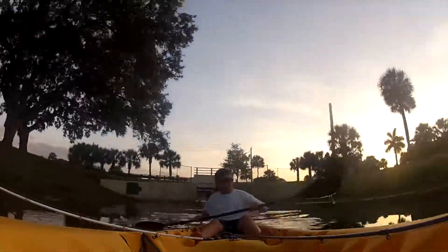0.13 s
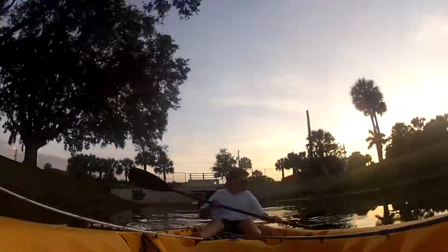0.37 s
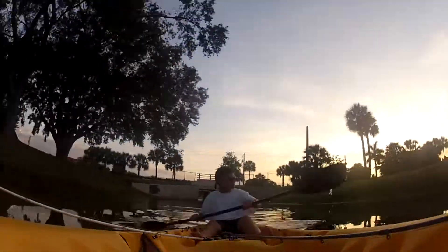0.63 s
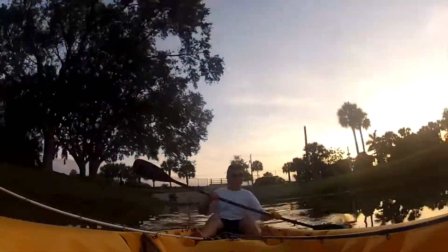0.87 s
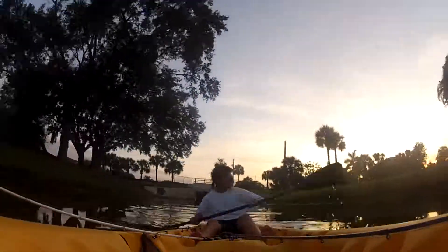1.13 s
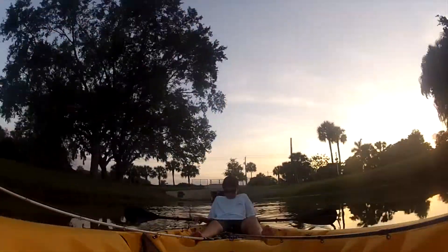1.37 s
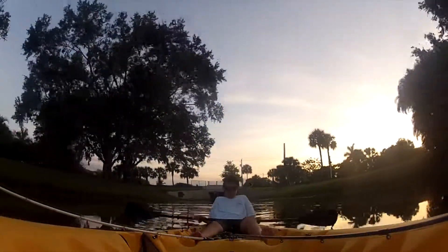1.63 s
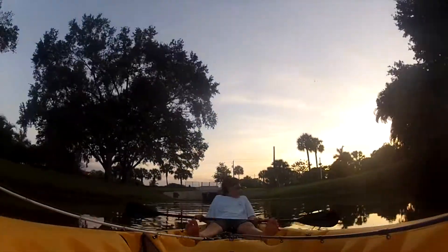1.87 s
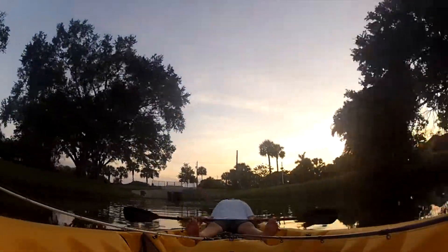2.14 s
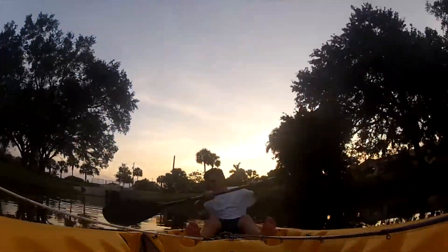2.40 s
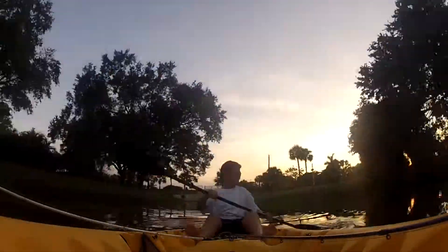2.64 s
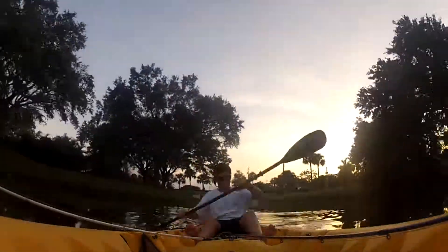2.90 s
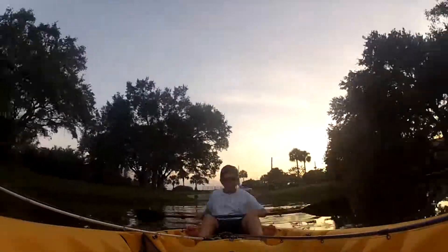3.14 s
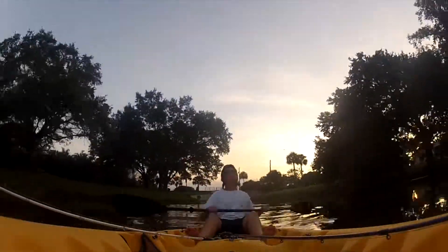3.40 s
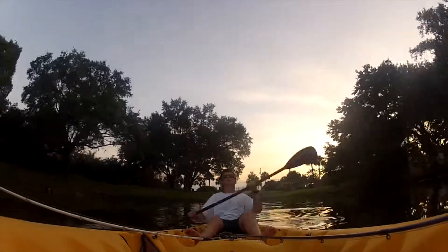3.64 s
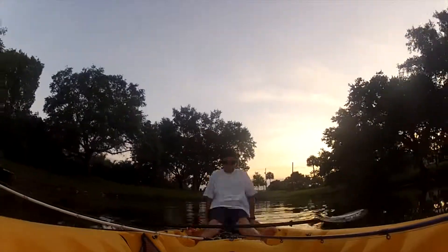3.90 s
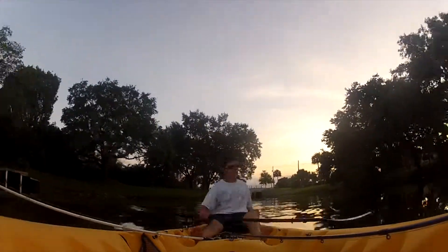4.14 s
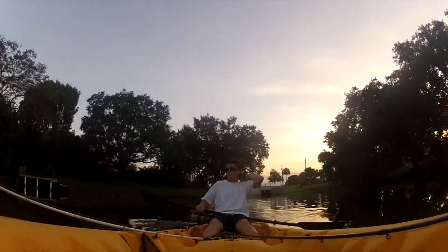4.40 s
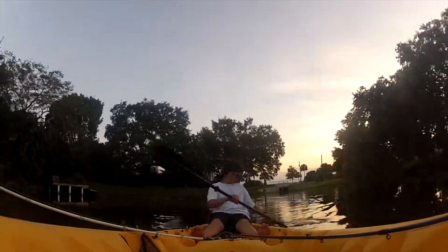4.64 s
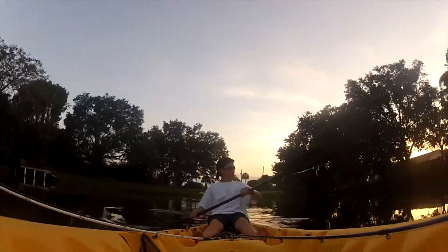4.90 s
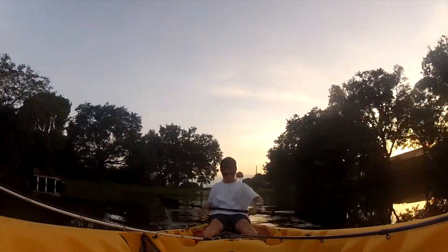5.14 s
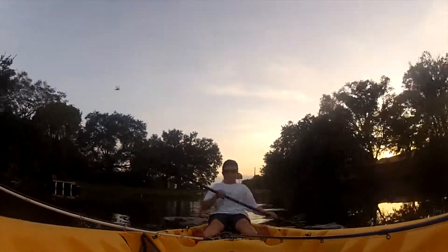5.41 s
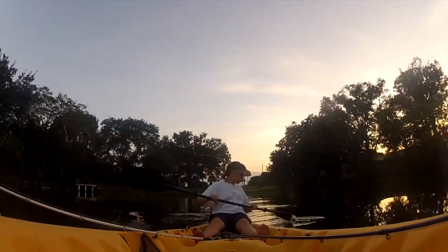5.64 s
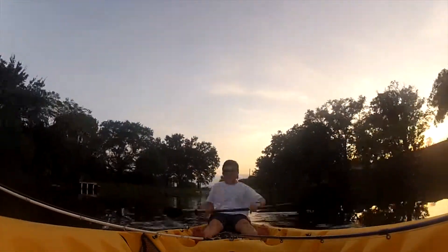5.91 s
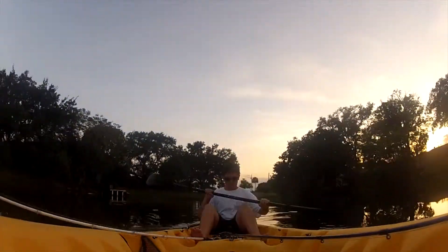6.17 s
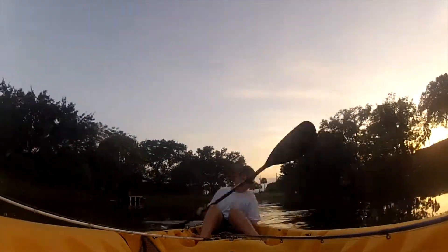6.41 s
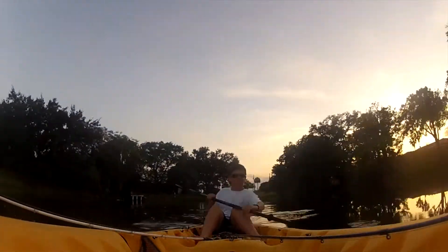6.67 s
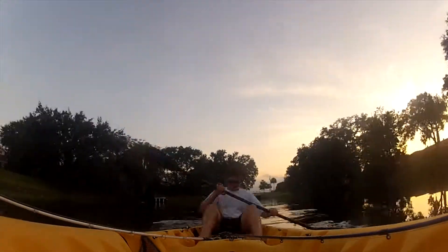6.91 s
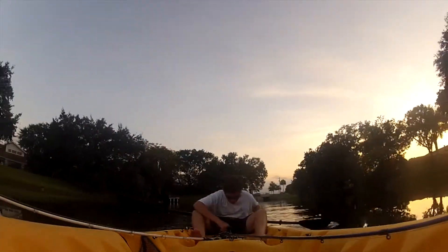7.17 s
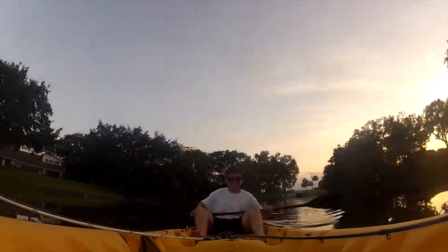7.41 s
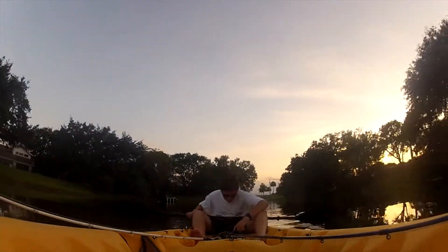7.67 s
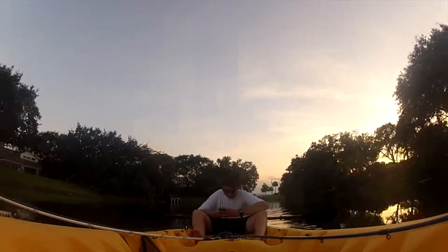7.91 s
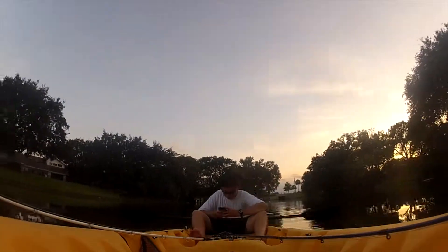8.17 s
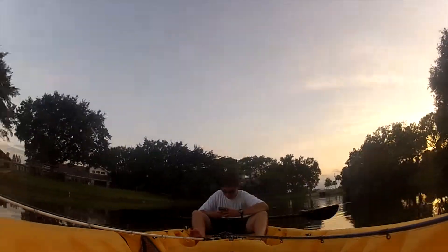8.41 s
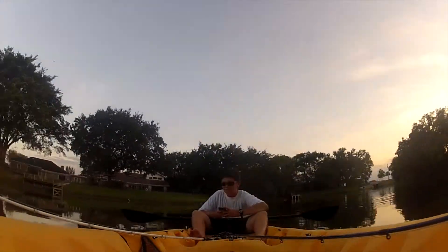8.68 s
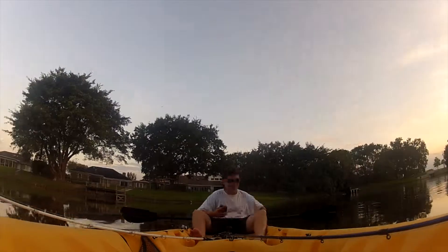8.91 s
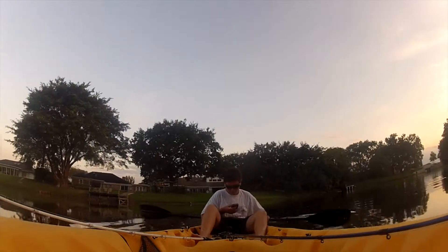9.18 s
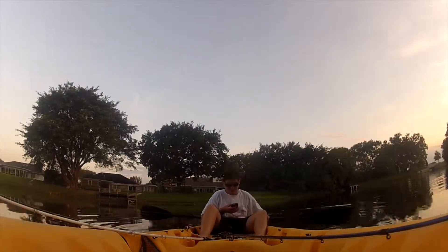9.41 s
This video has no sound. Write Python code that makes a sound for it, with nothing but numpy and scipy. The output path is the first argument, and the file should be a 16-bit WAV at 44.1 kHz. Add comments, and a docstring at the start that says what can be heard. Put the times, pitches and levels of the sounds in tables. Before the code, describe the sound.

Gear and cloth rub and tick against a hollow plastic hull outdoors, heard muffled and midrange-heavy from inside a small case. Scattered knocks lead to a rapid, loud tumble at about four seconds while a distant motor tone sags underneath. More isolated clacks and low bumps follow until about six seconds, then lighter ticks, a brief rubbery chirp, and nearly still air with a very faint thin tone near the end.

```python
"""Gear on a plastic kayak hull on a calm pond, heard by a microphone shut in a small housing.
Over a faint outdoor hiss, knocks and rubs run from the start, soft bumps join from 1.3 s; each knock rings
the housing's boxy low modes, the hull's middle modes and a short bright crackle. A far engine whine sags
from 1.8 s to 5.3 s; the knocks crowd near 4 s. A gliding sine pair squeaks at 6.9 s, a fainter whine
follows at 7.2 s, and band-passed noise gives a thin fuzzy tone near 3 kHz at 9.2 s."""
import sys
import numpy as np
from scipy import signal
from scipy.fft import rfft, irfft, next_fast_len
from scipy.io import wavfile
from scipy.ndimage import uniform_filter1d, map_coordinates

SR = 44100
rng = np.random.default_rng(int(sys.argv[2]) if len(sys.argv) > 2 else 0)


def volts_from_db(level):
    """Convert decibel levels to linear amplitude ratios."""
    exponent = np.asarray(level, float) / 20
    return 10 ** exponent


def materialize(psi):
    """Save the field psi as 16-bit PCM at rate SR to the path in sys.argv[1].

    A 1-D psi becomes a single channel; in a 2-D psi each row is a channel.
    """
    bounded = np.clip(np.atleast_2d(psi).T, -1, 1)
    quanta = np.round(bounded * 32767).astype(np.int16)
    wavfile.write(sys.argv[1], SR, quanta)


N = 421155

# Resonances of housing, hull, bright crackle and deep hull.
# Each row: centre in Hz, width in Hz, relative level in dB.
HOUSING_MODES = [(473, 160, -40.5), (612, 61, -7.5), (751.5, 49, 1.5), (855.6, 66.5, 0)]
HULL_MODES = [(1296, 57, 3.5), (1480, 70, 6.5), (1750, 130, 4.5), (2133, 380, -1), (2470, 300, -0.5),
              (3185, 240, -3)]
CRACKLE_MODES = [(3980, 1300, -2.5), (6330, 1100, -4), (8460, 1100, -1.5), (12350, 2200, -5.5),
                 (16200, 2000, -5)]
DEEP_MODES = [(133, 47, -15), (190, 58, -2), (259, 88, 1.5), (400, 440, 1.5)]


def unit(x):
    """Scaled to rms 1."""
    return x / np.sqrt(np.mean(x ** 2) + 1e-20)


def wobble(rate_hz):
    """Smooth random curve with rate_hz knots a second."""
    knots = rng.standard_normal(int(N * rate_hz / SR) + 4)
    return map_coordinates(knots, [np.arange(N) * rate_hz / SR])


def filtered(x, response):
    """x times a complex response of frequency in Hz."""
    n = x.shape[-1]
    m = next_fast_len(n + 8192)
    return irfft(rfft(x, m) * response(np.fft.rfftfreq(m, 1 / SR)), m)[..., :n]


def ringing(x, modes):
    """x through parallel resonances; neighbours swing in opposite phase."""
    def response(f):
        total = 0
        for k, (centre_hz, width_hz, db) in enumerate(modes):
            damping = 1j * f * width_hz
            total = total + (-1) ** k * volts_from_db(db) * damping / (centre_hz * centre_hz - f * f + damping)
        return total
    return filtered(x, response)


def place(sounds, start_s):
    """Adds each row of sounds at its start time."""
    where = np.round(start_s * SR).astype(int) + np.arange(sounds.shape[1])
    return np.bincount(where.ravel(), sounds.ravel(), N + sounds.shape[1])[:N]


def grains(per_second, spread_db, life_ms):
    """Random tiny contacts, a few much larger than the rest, each a short puff of noise."""
    hit = rng.random(N) < per_second / SR
    size = hit * volts_from_db(spread_db * np.minimum(rng.exponential(size=N), 4))
    t = np.arange(1024) / SR
    envelope = signal.fftconvolve(size, np.exp(-1000 * t / life_ms))[:N]
    return unit(envelope * rng.standard_normal(N))


def pings(count, centre_hz, spread, cycles, spread_db):
    """Dense tiny snaps, each at its own pitch and only a few cycles long."""
    when = rng.random((count, 1))
    pitch = rng.standard_normal((count, 1))
    size = rng.exponential(size=(count, 1))
    hz = np.clip(centre_hz * np.exp(spread * pitch), 2000, 16000)
    turn = hz * np.arange(96) / SR
    envelope = turn * np.exp(-turn / cycles)
    snap = volts_from_db(spread_db * np.minimum(size, 4)) * envelope * np.sin(2 * np.pi * turn)
    return unit(place(snap, when * N / SR))


def struck(force, modes, scatter_db):
    """Rows of force ring the modes at new strengths each time; each row peaks at 1."""
    luck = rng.standard_normal((len(force), len(modes), 1))
    scattered = [(hz, width_hz, db + scatter_db * luck[:, m]) for m, (hz, width_hz, db) in enumerate(modes)]
    ring = ringing(force, scattered)
    # a broad hump keeps the sound in its range
    first_hz, last_hz = modes[0][0], modes[-1][0]
    ring = ringing(ring, [(np.sqrt(first_hz * last_hz), 1.9 * last_hz, 0)])
    return ring / np.abs(ring).max(axis=1, keepdims=True)


def air():
    """Outdoor hiss through the housing: shaped noise, its level barely breathing."""
    # Hiss spectrum. Each row: frequency in Hz, relative density in dB per Hz.
    hiss_spectrum = [(25, -30.5), (200, -16.5), (400, -13.5), (750, -0.5), (1130, -8), (1480, -1.5),
                     (2900, -7.5), (7000, -19), (12000, -24), (16000, -18)]
    level_db = -61
    hz, db = np.transpose(hiss_spectrum)
    hiss = filtered(rng.standard_normal(N), lambda f: volts_from_db(np.interp(np.log(f + 1), np.log(hz + 1), db)))
    return volts_from_db(level_db + 0.92 * wobble(6.0)) * unit(hiss)


def whines():
    """Far engines: sines sagging steadily in pitch, slightly unsteady in pitch and level."""
    # Each row: start in s, loudest in s, end in s, pitch at start in Hz before waver,
    # loudest level in dB before flicker.
    whine_rows = [(1.8, 2.848, 5.3, 881, -47), (7.201, 8.3, 8.85, 1019, -65.5)]
    sag_hz_per_s, waver_hz = 61, 5
    end_drop_db, flicker_db = 21.5, 3
    t = np.arange(N) / SR
    out = np.zeros(N)
    for start, loudest, end, start_hz, loudest_db in whine_rows:
        hz = start_hz - sag_hz_per_s * (t - start) + waver_hz * wobble(22)
        db = loudest_db - end_drop_db * np.interp(t, [start, loudest, end], [1, 0, 1])
        heard = (t > start) & (t < end)
        tone = np.sin(2 * np.pi * np.cumsum(hz) / SR)
        out = out + heard * volts_from_db(db + flicker_db * wobble(25)) * tone
    return out


def fuzzy_tone():
    """Thin far tone: noise through two narrow resonances near 3 kHz, fading on both sides."""
    start_s, length_s = 9.22, 0.15
    level_db, fade_db_per_s = -67.5, 148.5
    t = np.arange(N) / SR
    away_s = np.maximum(np.abs(t - start_s - length_s / 2) - length_s / 2, 0)
    tone = ringing(rng.standard_normal(N), [(2866, 96, -1.7), (3170, 83, 0)])
    return volts_from_db(level_db - fade_db_per_s * away_s) * unit(tone)


def squeak():
    """Rubber sticks and slips on plastic: a brief arched tone with a weak octave."""
    start_s, length_s, edge_s = 6.899, 0.039, 0.008
    low_hz, top_hz, sag_hz_per_s = 1550, 2430, 4000  # low and top before the sag
    level_db, rough_db, octave_db = -36.5, 4.5, -23
    t = np.arange(N) / SR - start_s
    inside_s = np.minimum(t, length_s - t)
    hz = low_hz + (top_hz - low_hz) * np.clip(inside_s / edge_s, 0, 1) - sag_hz_per_s * t
    phase = 2 * np.pi * np.cumsum(hz) / SR
    gate = np.clip(inside_s / 0.00041, 0, 1)
    tone = np.sin(phase) + volts_from_db(octave_db) * np.sin(2 * phase)
    return gate * volts_from_db(level_db + rough_db * wobble(400)) * tone


def shifting():
    """Rub and rustle levels in dB as the paddler shifts about: quick attack, ripple, fade; powers add."""
    # Each row: time of full level in s, length before the fade in s, rubbing in dB before ripple,
    # rustle over rubbing in dB, ripple rate in Hz.
    shift_rows = [(-.082, 0.92, -45, -7, 12.9), (0.909, 0.49, -44, -8.5, 9.9),
                  (1.652, 0.204, -49, -15.5, 8.5), (2.418, 0.26, -45, -10.5, 13),
                  (2.68, 0.56, -48.5, -8, 10.56), (3.214, 1, -51, -10.5, 10.7),
                  (3.94, 0.17, -30.5, -19.5, 26), (4.28, 0.04, -47.5, -10.5, 12),
                  (4.414, 0.041, -54.5, -11, 19), (4.674, 0.36, -54, -10.5, 11.8),
                  (5.121, 0.049, -48.5, -11, 23), (5.319, 0.29, -49.5, -8, 8.2),
                  (5.616, 0.235, -47.5, -9, 7.5), (5.906, 0.21, -43, -7, 17.6),
                  (6.181, 0.049, -38, -5.5, 23), (6.362, 0.094, -45.5, -8.5, 20.3),
                  (6.61, 0.157, -48, -8.5, 5.5), (6.839, 0.19, -44, -8.5, 16.5),
                  (7.114, 0.35, -58.5, -17, 23.2), (7.559, 0.025, -52, -10, 21),
                  (8.946, 0.15, -58, -18, 13)]
    attack_s, fade_db_per_s = 0.02, 105
    ripple_db = 2  # level ripple either way
    still_rub_db, still_rustle_db = -74, -82
    t = np.arange(N) / SR
    rub_power, rustle_power = volts_from_db(2 * still_rub_db), volts_from_db(2 * still_rustle_db)
    for s, length_s, db, bright_db, ripple_hz in shift_rows:
        ripples_db = ripple_db * np.cos(2 * np.pi * ripple_hz * (t - s))
        fade_db = fade_db_per_s * np.maximum(t - s - length_s, 0)
        attack = np.clip((t - s) / attack_s + 1, 0, 1)
        power = attack ** 2 * volts_from_db(2 * (db + ripples_db - fade_db))
        rub_power = rub_power + power
        rustle_power = rustle_power + power * volts_from_db(2 * bright_db)
    return 10 * np.log10(rub_power), 10 * np.log10(rustle_power)


def moving():
    """Cloth and gear slide on the plastic in clumped grains; the rocking hull rumbles along."""
    rub_db, rustle_db = shifting()
    clumps = wobble(18)
    slips = grains(440, spread_db=2.5, life_ms=1.9) + 0.67 * rng.standard_normal(N)
    rub = 0.72 * unit(ringing(slips, HOUSING_MODES)) + 0.64 * unit(ringing(slips, HULL_MODES))
    snaps = pings(count=9000, centre_hz=11840, spread=0.17, cycles=1.6, spread_db=3.0)
    rustle = unit(unit(ringing(slips, CRACKLE_MODES)) + 1.23 * snaps)
    rumble = unit(volts_from_db(3 * wobble(18)) * ringing(rng.standard_normal(N), DEEP_MODES))
    rub = volts_from_db(rub_db + 3.3 * clumps) * rub
    rustle = volts_from_db(rustle_db + 2.2 * clumps + 3.5 * wobble(110)) * rustle
    return rub + rustle + volts_from_db(0.52 * rub_db - 39.5) * rumble


def bumps():
    """Soft weight lands on the hollow hull: a slow rough push into the deep modes near the loaded spot."""
    # Each row: start in s, peak in dB, pitch of the loaded spot in Hz.
    bump_rows = [(1.319, -40, 253), (1.685, -55, 165), (1.805, -42, 140), (1.884, -57, 160),
                 (2.491, -37.5, 312), (2.861, -47, 250), (3.941, -38, 200), (4.03, -39, 190),
                 (4.138, -36.5, 181.5), (4.272, -44, 195), (4.456, -51, 203), (5.658, -42.5, 252),
                 (6.183, -20.5, 307), (6.412, -50.5, 225), (6.717, -44.5, 247), (7.599, -53, 150)]
    s, peak_db, spot_hz = (c[:, None] for c in np.transpose(bump_rows))
    u = np.arange(8192) / SR / 0.014  # time over the 14 ms push
    force = rng.standard_normal((len(s), len(u))) * u * np.exp(-u)
    modes = [(hz, width_hz, db - 12 * np.abs(np.log2(hz / spot_hz))) for hz, width_hz, db in DEEP_MODES]
    return place(volts_from_db(peak_db) * struck(force, modes, scatter_db=1.0), s)


def knocks():
    """Each contact is a sharp blow with a rough rattle after it, in housing, hull and crackle."""
    # Each row: start in s, hull peak in dB, housing peak over hull in dB,
    # crackle peak (hard edge) over hull in dB, pitch of the struck spot in Hz.
    knock_rows = [(.015, -27.5, -17, -14, 1920), (0.074, -37.5, 4, 2, 1740), (0.168, -32, -37, -3, 1820),
                  (.23, -37, -17, -3, 2500), (.475, -27.5, -19, -10, 2170), (.496, -42.5, 13, -1, 1750),
                  (.65, -31, -11, -17, 2150), (.73, -31.5, -1.5, -4, 2280), (0.807, -29, -0.5, -4, 2010),
                  (1.012, -32, -21, 1, 2180), (1.08, -7.5, -1, -6, 2070), (1.151, -28, -8, -11, 2000),
                  (1.309, -43.5, 19, -3, 1710), (1.321, -40, 18.5, -4, 1420),
                  (1.347, -27.5, -13, -4.5, 1800), (1.38, -28, -6, -19, 2220), (1.776, -26.5, -8, -2, 2170),
                  (1.815, -25.5, 5.5, -32, 1920), (1.878, -28.5, -3, -13, 1940),
                  (2.073, -36, -3.5, -25, 1940), (2.267, -28.5, -12.5, -30, 1620),
                  (2.414, -46.5, 11, 1, 1700), (2.42, -38, 5.5, 3, 1904), (2.454, -30.5, 0.5, -18, 1970),
                  (2.485, -25.5, -3.5, 6, 2680), (2.495, -27, 4.5, -6.5, 1610),
                  (2.552, -22.5, -31, -17.5, 2770), (2.646, -21, -3.5, 4, 2720),
                  (2.802, -59.5, 31.5, -10, 1550), (2.866, -49.5, 23.5, -2, 1460),
                  (3.058, -31.5, -7, -6.5, 1520), (3.391, -33, -6.5, -6.5, 1870),
                  (3.883, -44.5, 15.5, 4.5, 1860), (3.913, -30.5, 4.5, 3, 2110),
                  (3.938, -13, 4.5, -4.5, 1560), (3.957, -8.5, 0, -7, 2480), (3.968, -23, 12, -13, 2264),
                  (3.987, -8.5, -19, -2.5, 3800), (4.02, -26, 8.5, -16.5, 1486),
                  (4.044, -25, 0, -26.5, 1930), (4.068, -21, 3, -7.5, 2537), (4.102, -29.5, 20.5, -2, 1920),
                  (4.117, -23, 11, -14, 1610), (4.127, -10.5, 11.5, 2.5, 1880), (4.136, -12, 6, -21, 2260),
                  (4.163, -6, -1.5, -16.5, 2470), (4.184, -17, 5.5, -2, 1900), (4.222, -36, -9, 6, 2086),
                  (4.26, -27.5, -6, 5, 2100), (4.27, -32.5, 11, -18, 1950), (4.281, -9, 4.5, -16, 1535),
                  (4.289, -14.5, 1, -24.5, 1530), (4.669, -30, -6, -33, 1920), (4.846, -28, -11, -14, 2040),
                  (5.019, -34, -9, -7, 1690), (5.112, -31.5, -23, -33, 1650), (5.31, -32.5, 5.5, -28, 1700),
                  (5.417, -28, -14, -5, 2000), (5.634, -24, 5.5, -4, 1980), (5.659, -7, -1.5, -9.5, 1440),
                  (5.733, -26.5, -8, -12, 1830), (5.802, -32.5, -24, -16, 1700),
                  (5.827, -31, -3.5, -2.5, 2210), (6.014, -13, -2.5, -5.5, 1420),
                  (6.185, -12, 2.5, -17.5, 1840), (6.19, -13.5, -5, -3, 2180),
                  (6.208, -21.5, -12, -4, 2350), (6.231, -29, -2, 3, 1760), (6.411, -34, -13, -4, 1830),
                  (6.418, -47, 13.5, -8, 1500), (6.473, -33, 12.5, -3.5, 1420),
                  (6.644, -29.5, -15, -2.5, 2120), (6.725, -44, 18, -13, 1850), (7.029, -21, 3, -11, 1940),
                  (7.036, -18.5, 2, 6, 2470), (7.199, -33.5, -0.5, -17, 1480), (7.286, -49, 14.5, -4, 1480),
                  (7.451, -47, 12, 8.5, 1970), (7.489, -40, -7, 2, 2200), (7.672, -39, -8, 4, 2100),
                  (7.721, -53.5, 21, -13.5, 1520), (7.83, -31, -6, -15.5, 2375),
                  (7.838, -30.5, -14, -30, 2500), (7.853, -30, -21.5, -34, 2400),
                  (7.962, -29, 1.5, -3.5, 1960), (8.943, -36, -0.5, -13.5, 1600),
                  (9.015, -37, 1.5, 0.5, 2050)]
    chatter_db = 4.5
    s, hull_db, shake_db, hard_db, spot_hz = (c[:, None] for c in np.transpose(knock_rows))
    t = np.arange(4096) / SR
    shape = len(s), len(t)
    # the struck spot rings at its own pitch and favours the hull modes near it
    hull = [(hz, width_hz, db - 13 * np.abs(np.log2(hz / spot_hz))) for hz, width_hz, db in HULL_MODES]
    hull.append((spot_hz, 230, 3))
    # loose gear chatters unevenly after the blow
    chatter = volts_from_db(chatter_db * unit(uniform_filter1d(rng.standard_normal(shape), size=100)))
    # Each row: peak in dB, modes, blow in s, roughness from 0 to 1, rattle decay in s, rattle in dB.
    parts = [(hull_db + shake_db, HOUSING_MODES, .00015, .3, .014, -17),
             (hull_db, hull, .0007, .95, .009, -18),
             (hull_db + hard_db, CRACKLE_MODES, .001, 1, .011, -15)]
    sound = 0
    for peak_db, modes, blow_s, rough, rattle_s, rattle_db in parts:
        noise = rng.standard_normal(shape)
        push = t / blow_s * np.exp(1 - t / blow_s) * (1 - rough + rough * noise)
        rattle_envelope = np.exp(-t / rattle_s) * (1 - np.exp(-t / blow_s))
        force = push + volts_from_db(rattle_db) * chatter * rattle_envelope * noise
        sound = sound + volts_from_db(peak_db) * struck(force, modes, scatter_db=5.5)
    return place(sound, s)


def scene():
    """All sources reach one microphone."""
    return (air() + whines() + fuzzy_tone() + squeak() + moving() + bumps() + knocks())[None]


def roll_off(x):
    """The treble ends steeply here."""
    return signal.sosfilt(signal.butter(12, 16660, fs=SR, output="sos"), x)


def record(dry):
    """The loudest blows flatten, one side sooner, which adds a low thump; the treble is band-limited."""
    band_limit_hz, rolloff_hz = 16000, 15900
    ceiling = np.where(dry > 0, 0.8, 0.76)
    soft = dry / (1 + np.abs(dry / ceiling) ** 6) ** (1 / 6)
    mix = filtered(soft, lambda hz: (hz < band_limit_hz) / (1 + (hz / rolloff_hz) ** 12))
    return roll_off(mix)


dry = scene()
out = record(dry)
materialize(out)
```